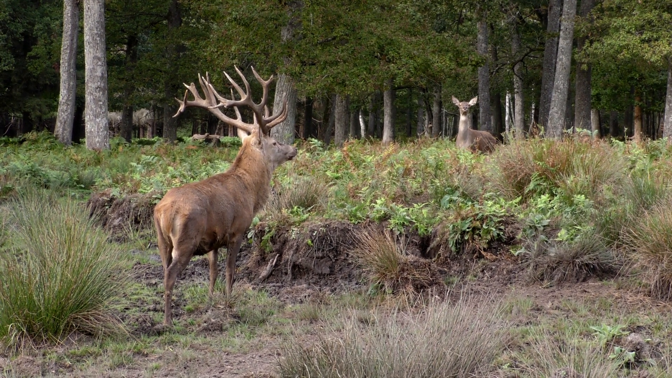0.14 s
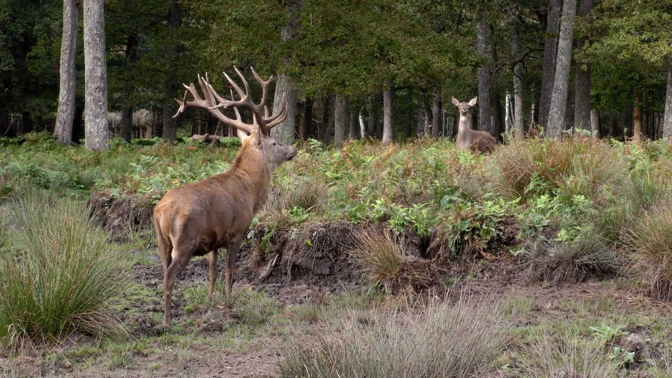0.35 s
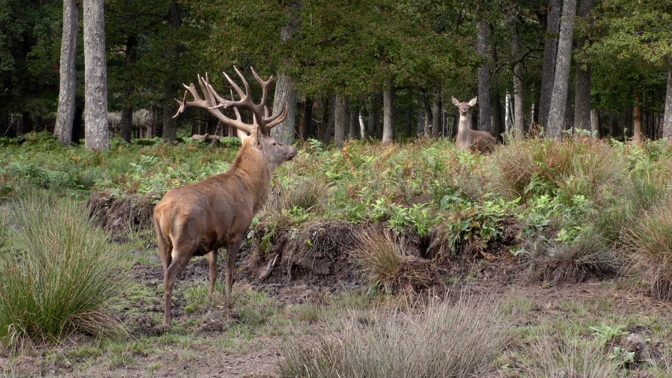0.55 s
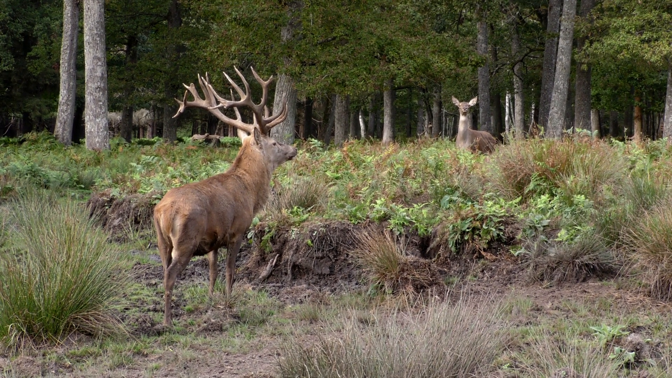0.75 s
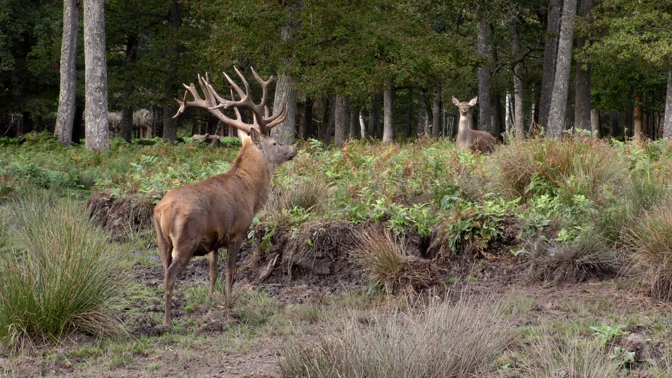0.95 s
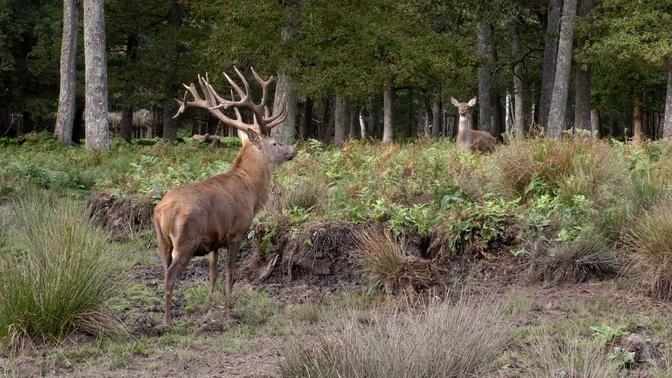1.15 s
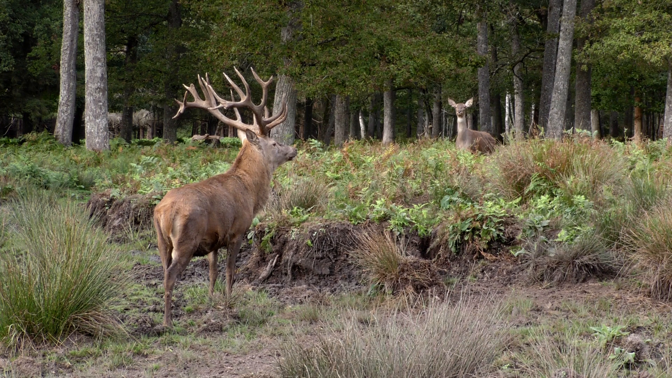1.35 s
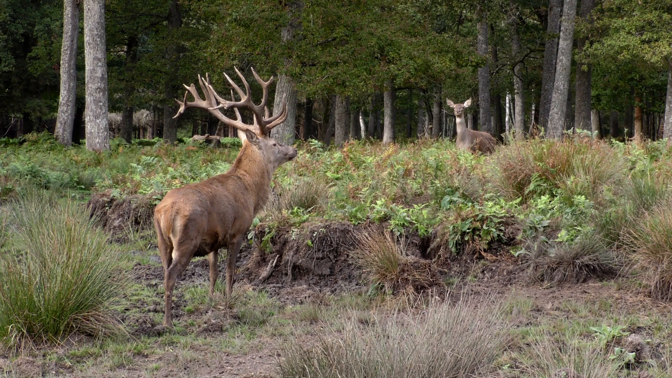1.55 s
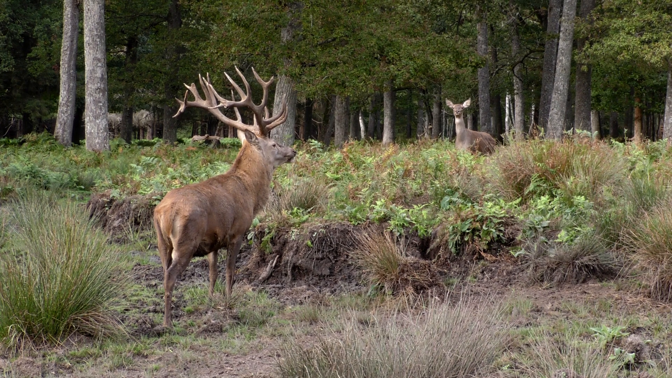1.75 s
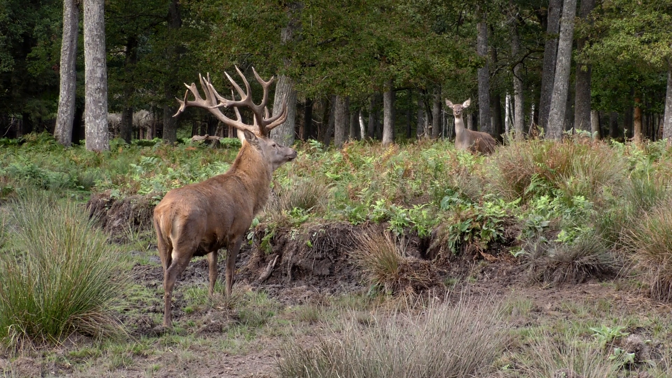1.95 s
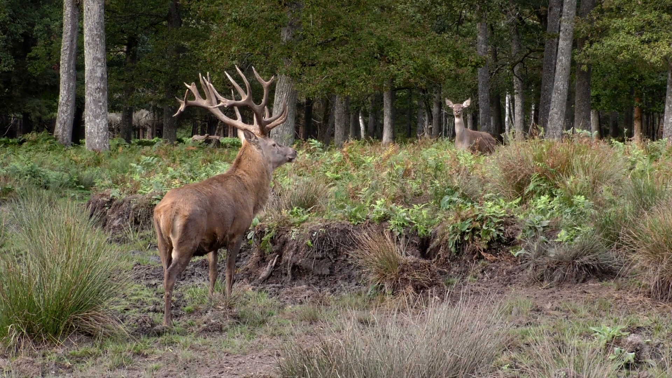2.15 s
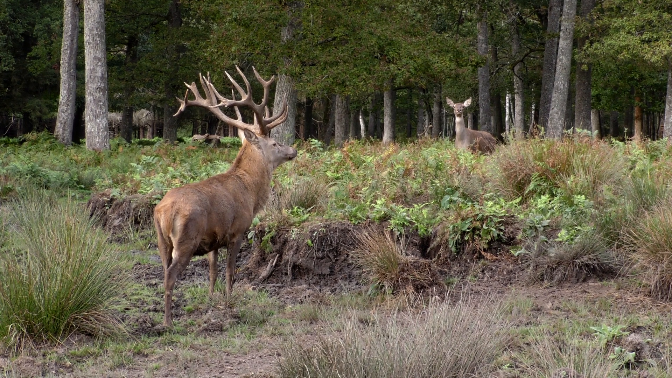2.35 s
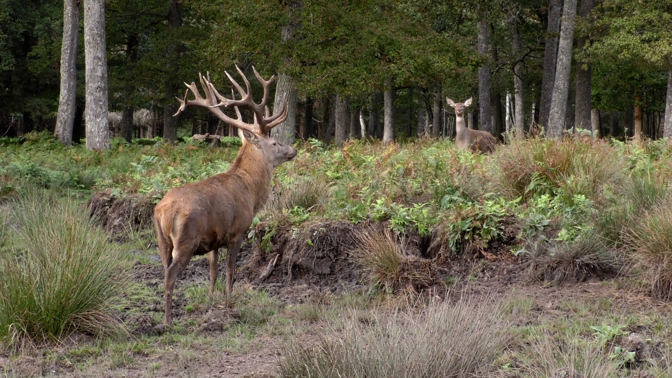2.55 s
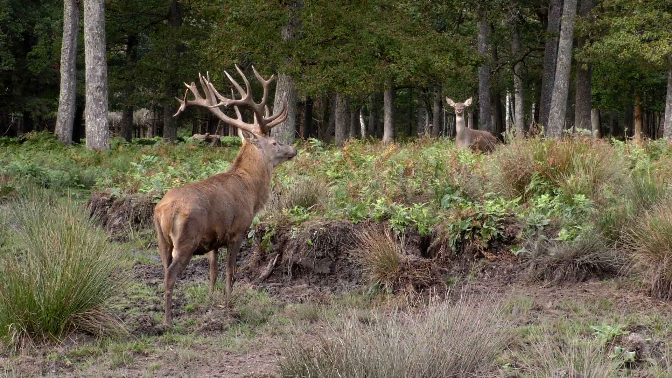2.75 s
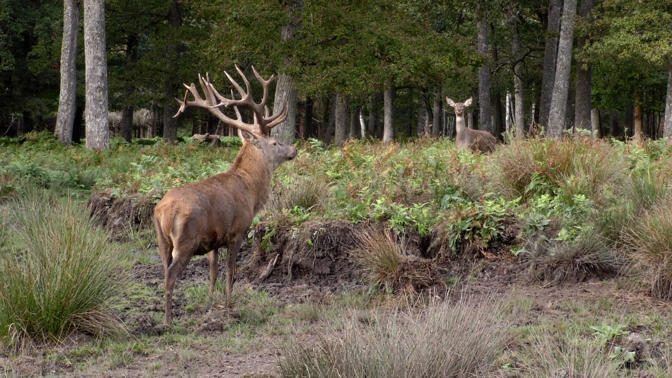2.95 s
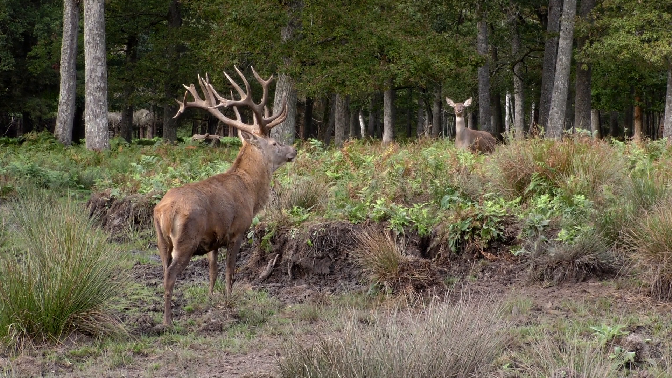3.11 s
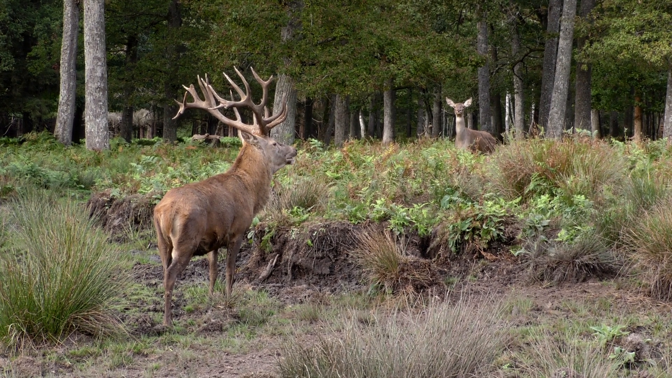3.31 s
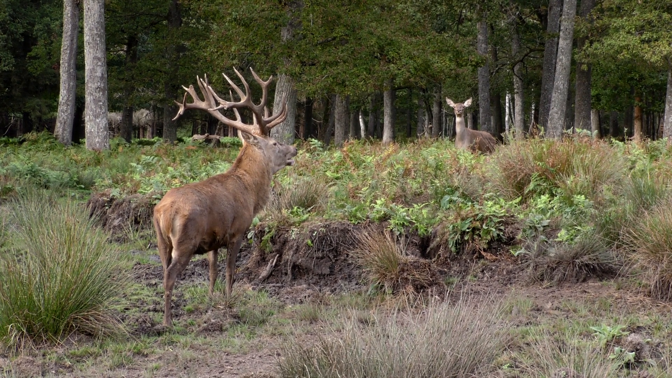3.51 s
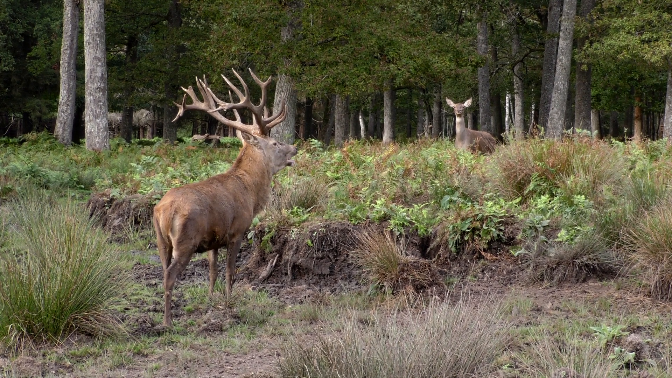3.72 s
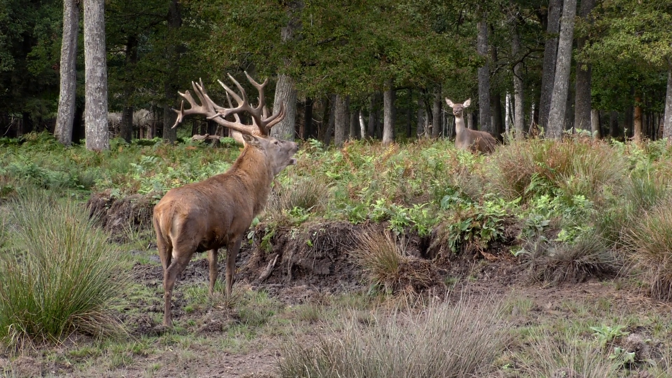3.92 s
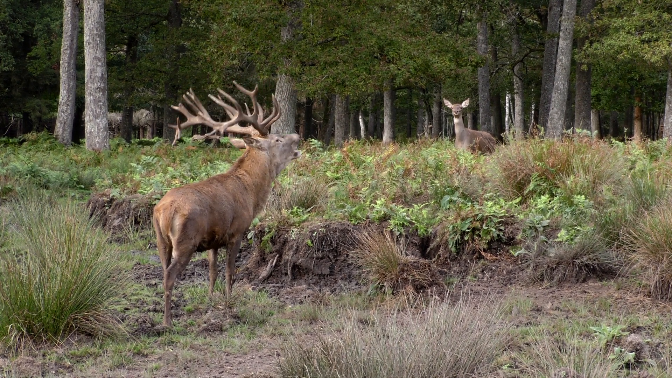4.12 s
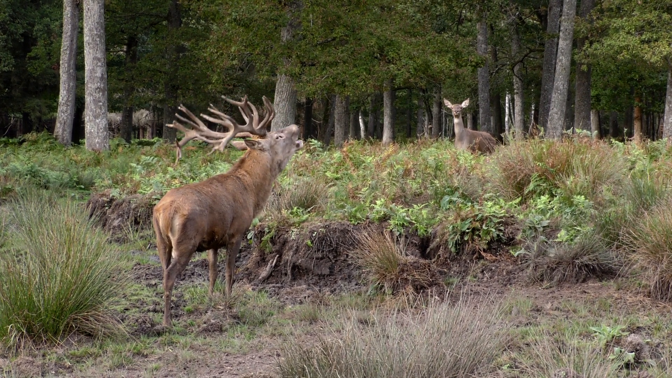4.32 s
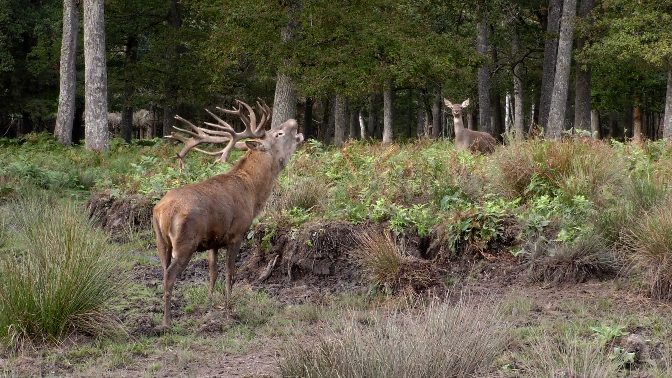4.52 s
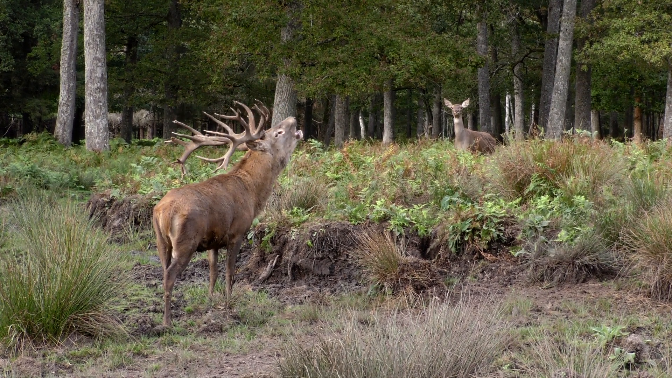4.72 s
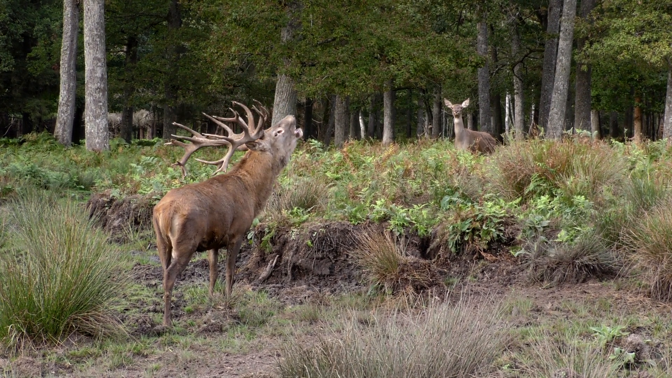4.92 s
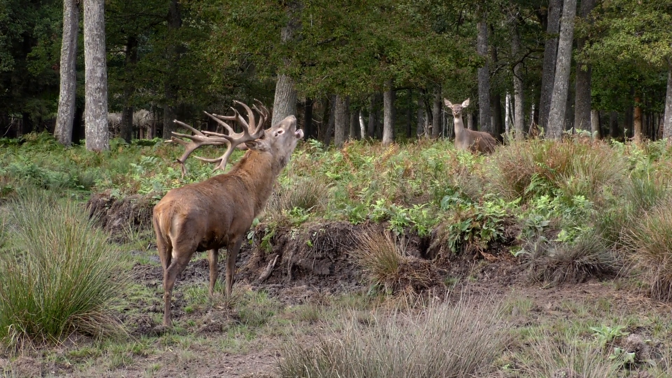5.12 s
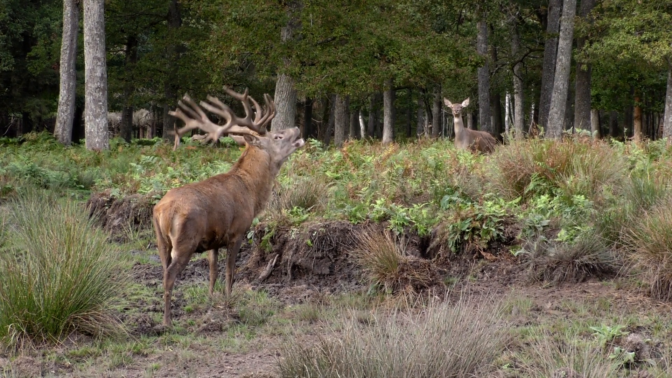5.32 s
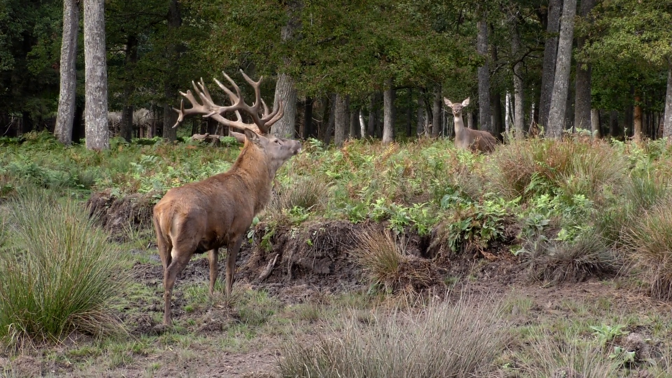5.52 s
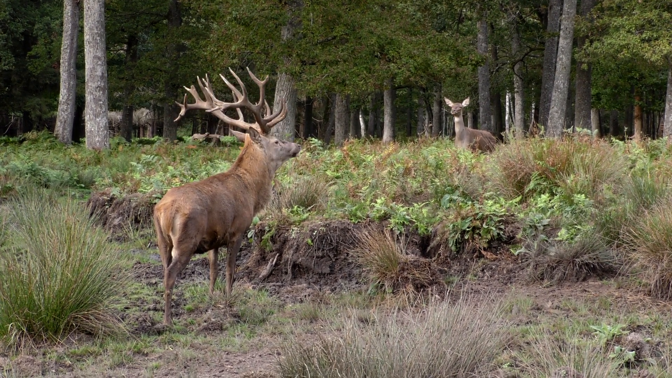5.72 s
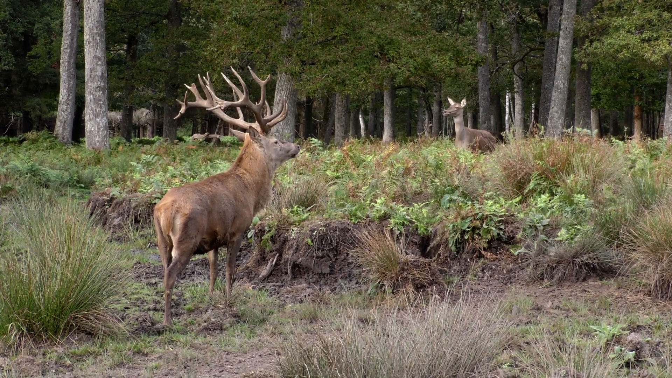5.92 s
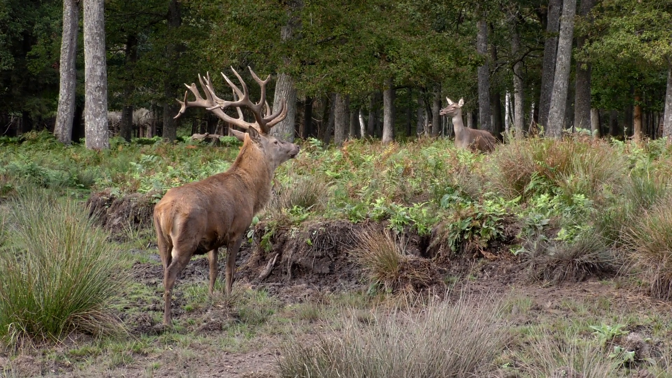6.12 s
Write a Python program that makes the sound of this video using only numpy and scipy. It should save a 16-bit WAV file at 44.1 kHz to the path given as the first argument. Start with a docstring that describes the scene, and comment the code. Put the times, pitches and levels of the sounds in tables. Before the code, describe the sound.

A red deer stag roars once, from low pulsing groan to coarse sustained bellow, echoing long through a quiet forest with distant bird calls.

```python
"""A woodland clearing: a red deer stag roars once, and the forest rings on. Uneven vocal-fold pulses and turbulent
puffs ring moving throat resonances: a low pulsing groan climbs in pitch while the stretching neck pulls the
resonances down, then a long harsh hold and a rattling collapse, followed by a soft hiss. Around it: a far crow-like
bird of gliding harmonics, a small bird's swept chips, an insect's rows of clicks, narrow noise ticks, wavering
hum tones, and still air of shaped noise."""
import sys
import numpy as np
from scipy import signal
from scipy.fft import rfft, irfft
from scipy.io import wavfile
from scipy.ndimage import uniform_filter1d, map_coordinates

SR = 44100
rng = np.random.default_rng(int(sys.argv[2]) if len(sys.argv) > 2 else 0)


def waveform_to_disk(signal):
    """Save audio, clipped to [-1, 1], as 16-bit WAV at the path in sys.argv[1]."""
    frames = np.transpose(np.atleast_2d(signal))
    scaled = np.clip(frames, -1, 1) * 32767
    samples = np.round(scaled).astype(np.int16)
    wavfile.write(sys.argv[1], SR, samples)


N = 276116
TIME = np.arange(N) / SR
SIDES = np.array([[1], [-1]])  # left, right

# The effort of the roar. Each row: time in seconds, level in dB, edge in dB, rasp in dB.
# Edge and rasp are the two upper ranges of the voice, relative to the level.
EFFORT = [(3.58, -63, -16, -20), (3.636, -56, -21.5, -25), (3.648, -49.5, -24, -32),
          (3.685, -48, -19, -34.5), (3.73, -42, -15.5, -31), (3.78, -38.5, -12.5, -32.5),
          (3.9, -33.5, -18.5, -42), (3.98, -29.5, -25, -44), (4.015, -30.5, -14.5, -46),
          (4.06, -29, -23, -42), (4.115, -25.5, -20, -39.5), (4.165, -24, -24.5, -44.5),
          (4.205, -21.5, -21.5, -35.5), (4.228, -17.5, -34, -41), (4.29, -19, -23, -36.5),
          (4.322, -22.5, -30.5, -34), (4.364, -22, -18.5, -38.5), (4.642, -22.5, -24.5, -36),
          (4.785, -23, -25.5, -39.5), (4.83, -23.5, -20, -37), (5.026, -26, -21, -39),
          (5.064, -22.5, -26, -40.5), (5.138, -23, -19, -44.5), (5.178, -23.5, -30, -46),
          (5.205, -22, -25, -41), (5.216, -25, -25.5, -45), (5.238, -29, -28, -38.5),
          (5.253, -25.5, -23.5, -38), (5.28, -31.5, -24.5, -43), (5.316, -34.5, -24, -43),
          (5.335, -47, -27, -33)]
# the voice collapses: the mouth falls partly open again and the slack folds thud
COLLAPSE_S, COLLAPSE_RAMP_S = 5.203, 0.008


def undb(db):
    """Decibels to gain."""
    return 10 ** (np.asarray(db) / 20)


def unit(x):
    """Scale to rms 1."""
    return x / np.sqrt(np.mean(x ** 2) + 1e-30)


def curves(table, at=TIME):
    """The columns of a table, joined by straight lines in time."""
    s, *columns = np.transpose(table)
    return np.array([np.interp(at, s, column) for column in columns])


def across(points, hz):
    """A (Hz, value) table read on a log-frequency axis."""
    f, value = np.transpose(points)
    return np.interp(np.log(hz + 1e-6), np.log(f), value)


def ramp(when, start, length):
    """A straight rise from 0 to 1."""
    return np.clip((when - start) / length, 0, 1)


def causal(gain):
    """The minimum-phase response with this magnitude: it rings after a pulse, never before."""
    cepstrum = irfft(np.log(gain + 1e-9))
    half = cepstrum.shape[-1] // 2
    cepstrum[..., 1:half] *= 2
    cepstrum[..., half + 1:] = 0
    return np.exp(rfft(cepstrum))


def colour(x, points, size=2048):
    """Filter by a (Hz, dB) spectrum."""
    gain = undb(across(points, np.fft.rfftfreq(size, 1 / SR)))
    return signal.fftconvolve(x, irfft(causal(gain)))[:len(x)]


def walk(rate):
    """Random levels held 1 / rate s and slewed twice; rms 1."""
    hold = max(int(SR / rate), 1)
    steps = np.repeat(rng.standard_normal(N // hold + 1), hold)
    slewed = uniform_filter1d(uniform_filter1d(steps, hold), hold)
    return unit(slewed[:N])


def steady(x, size=1100):
    """Hold the running rms at 1."""
    power = uniform_filter1d(uniform_filter1d(x ** 2, size), size)
    return x / np.sqrt(np.abs(power) + 1e-6 * np.mean(x ** 2))


def air(level_db=-60, rumble_pan_db=2):
    """A soft woodland hush over a low rumble that leans to the left, both from coloured noise."""
    # The colour of still air. Each row: frequency in Hz, relative level in dB per Hz.
    air_colour = [(20, 21), (35, 4), (55, 6.5), (80, 3), (110, -2), (170, -4), (240, -4), (295, -12),
                  (370, -2.5), (600, -0.5), (1000, -3.5), (1400, -5.5), (1750, -6), (2500, -8), (5000, -12),
                  (15000, -19)]
    # How alike the two ears hear it. Each row: frequency in Hz, correlation from -1 to 1.
    ear_likeness = [(40, 0.00026), (130, 0.56), (290, 0.78), (640, 0.75), (1410, 0.25), (3100, -0.13),
                    (6800, -0.38), (15000, -0.16)]
    hz = np.fft.rfftfreq(N, 1 / SR)
    alike = np.clip(across(ear_likeness, hz), -1, 1)
    mid, side = rfft(rng.standard_normal((2, N)))
    lean = SIDES * across([(40, rumble_pan_db), (150, 0.0077)], hz)
    both_ears = mid * np.sqrt(1 + alike) + SIDES * side * np.sqrt(1 - alike)
    hush = irfft(both_ears * undb(across(air_colour, hz) + lean), N)
    return unit(hush) * undb(level_db)


def hum(waver=0.0024, flutter_db=2, trim_db=-2):
    """Faint tones from far away: sines that waver slowly in pitch and level."""
    # The hum's tones. Each row: frequency in Hz, rms level in dB ahead of the trim.
    hum_tones = [(382.2, -75.5), (613.7, -82.5)]
    out = np.zeros(N)
    for hz, db in hum_tones:
        gain = undb(db + trim_db + flutter_db * walk(4.0))
        phase = 2 * np.pi * np.cumsum(hz * (1 + waver * walk(6.3))) / SR
        out += gain * np.sqrt(2) * np.sin(phase)
    return out


def ticks(ring_hz=3300, attack_s=0.0027, t60=0.11):
    """Faint dry ticks among the trees, each a brief burst of narrow noise."""
    # The ticks. Each row: time in seconds, level in dB.
    tick_hits = [(.69, -72), (.97, -68), (1.31, -70), (1.63, -71), (1.895, -68), (2.06, -73), (2.24, -70),
                 (2.99, -72), (3.3, -71)]
    strikes = np.zeros(N)
    for s, db in tick_hits:
        decay = undb(-60 * np.maximum(TIME - s, 0) / t60)
        strikes += undb(db) * ramp(TIME, s, attack_s) * decay
    band = [(.7 * ring_hz, -30), (.92 * ring_hz, 0), (1.08 * ring_hz, 0), (1.3 * ring_hz, -30)]
    return strikes * unit(colour(rng.standard_normal(N), band))


def insect(tooth_hz=330, tooth_share=0.45):
    """Short strokes of a toothed file: rows of tiny high clicks."""
    # The strokes. Each row: start in seconds, length in seconds, level in dB ahead of the colouring.
    rattle_strokes = [(5.673, 0.014, -56), (5.694, 0.016, -59), (5.728, 0.015, -62)]
    strokes = np.zeros(N)
    for start, length, db in rattle_strokes:
        strokes += undb(db) * ((TIME >= start) & (TIME < start + length))
    teeth = unit(np.exp(-(TIME * tooth_hz % 1) / tooth_share) * rng.standard_normal(N))
    return colour(strokes * teeth, [(5500, -31), (7200, -2.0), (10000, -1.0), (11800, -28)])


def hiss(start_s=5.53, attack_s=0.065, level_db=-68.5, fade_db_per_s=20):
    """A faint rush of coloured noise after the roar, which swells once and fades."""
    spectrum = [(1500, -14), (2600, -1.0), (3800, -3.0), (5100, -5.5), (5700, -17.0), (9000, -30)]
    rush = colour(rng.standard_normal(N), spectrum)
    age = np.maximum(TIME - start_s, 0)
    return unit(rush) * np.minimum(age / attack_s, 1) * undb(level_db - fade_db_per_s * age)


def diffuse(size):
    """Noise arriving from all around: two close-set microphones tell reflections apart only in the treble."""
    # Width of the reflections. Each row: frequency in Hz, side minus mid in dB.
    reflection_width = [(150, -22), (400, -27.5), (1000, -19), (2000, -5), (4000, -7)]
    mid, side = rng.standard_normal((2, size))
    return mid + colour(side, reflection_width) * SIDES


def scatter(x, t60):
    """Dense reflections from ground, leaves and nearby trunks; two channels."""
    response = diffuse(SR) * undb(-60 * TIME[:SR] / t60)
    return signal.fftconvolve(x[None], unit(response) / np.sqrt(SR), axes=1)[:, :N]


def forest(x, build_s=0.0036, size=131072):
    """Countless trunks send the sound back for seconds; the middle range lasts longest."""
    # The forest's answer by band. Each row: centre in Hz, level in dB, time to fall 60 dB in seconds.
    echo_bands = [(110, -6, 1.7), (198, 9, 2.2), (306, 2, 0.66), (345, 6.5, 2.34), (400, 9.5, 2.8),
                  (504, 1.5, 2.88), (690, 1, 3.4), (820, -2, 3.5), (1143, -0.5, 4.35), (1240, 2.5, 4.8),
                  (1420, -5, 4.16), (1640, 5.5, 4.23), (1940, 3, 3), (2290, 3.5, 4.4), (2960, 5, 2.3),
                  (4700, 13.5, 2.1), (9000, 0.5, .6)]
    t, hz = TIME[:size], np.fft.rfftfreq(size, 1 / SR)
    spectrum = rfft(diffuse(size))
    centres = np.array(echo_bands)[:, 0]
    response = 0
    # each row of the identity matrix opens one band and crossfades into its neighbours
    for (_, db, t60), own in zip(echo_bands, np.eye(len(echo_bands))):
        band = irfft(spectrum * across(np.c_[centres, own], hz))
        response = response + band * undb(db - 60 * t / t60)
    response = response * (1 - np.exp(-t / build_s)) / np.sqrt(SR)
    # moving air keeps changing the long paths, which blurs the pitch of the echoes
    drift_s = .0011 * walk(25)
    blurred = map_coordinates(x, [(TIME + drift_s) * SR], order=3)
    return signal.fftconvolve(blurred[None], response, axes=1)[:, :N]


def far_bird(spread=0.75, flutter_db=2.5, fall=.125, hoarseness=.03):
    """Nasal calls that sag in pitch and turn hoarse; the lowest harmonics lead and the higher ones swell after."""
    # The calls. Each row: start in seconds, length in seconds, starting pitch in Hz, rms level in dB.
    caw_calls = [(0.01, 0.24, 370, -69), (0.8, 0.29, 371.6, -68.5), (1.612, 0.3, 374, -69.5),
                 (2.492, .32, 368.7, -70), (3.415, 0.33, 371, -78)]
    # The harmonics. Each row: multiple of the pitch, level in dB, moment of the peak as a share of the call.
    caw_partials = [(2, 0, 0.05), (3, 3, 0.02), (4, -11, 0.3), (5, 3, 0.68), (6, -0.5, 0.63), (7, -3, 0.17)]
    out, wobble = np.zeros(N), hoarseness * walk(110)
    flutter = undb(flutter_db * walk(160))
    for start, length, hz, db in caw_calls:
        now = (TIME >= start) & (TIME < start + length)
        u = (TIME[now] - start) / length
        phase = 2 * np.pi * np.cumsum(hz * (1 + (wobble[now] - fall) * u ** 1.2)) / SR
        call = 0
        for multiple, partial_db, peak in caw_partials:
            swell = np.exp(-((u - peak) / spread) ** 2)
            call = call + undb(partial_db) * swell * np.sin(multiple * phase)
        envelope = np.abs(np.sin(np.pi * u)) ** 0.086  # nearly square
        out[now] += undb(db) * unit(call * flutter[now] * envelope)
    return out


def small_bird():
    """Each note is one rising whistle; the sharp chips are flicked upward within a few milliseconds."""
    # The notes. Each row: start in seconds, sweep length in seconds, from Hz, to Hz, peak level in dB.
    chip_sweeps = [(0.581, 0.004, 5940, 8050, -57), (0.584, 0.0064, 6800, 8200, -57),
                   (1.701, 0.0049, 4800, 8250, -52), (2.886, 0.004, 4730, 8400, -50),
                   (5.569, .12, 4890, 5160, -70)]
    out = np.zeros(N)
    for start, length, low_hz, high_hz, db in chip_sweeps:
        now = (TIME >= start) & (TIME < start + length)
        u = (TIME[now] - start) / length
        phase = 2 * np.pi * np.cumsum(low_hz + (high_hz - low_hz) * u) / SR
        out[now] += undb(db) * np.sin(phase) * np.sqrt(np.abs(np.sin(np.pi * u)))
    return out


def stretched(rest, full, when=TIME, lag=1):
    """A quantity that moves from its resting value to its full one as the neck stretches."""
    # The neck stretches and the larynx sinks, then eases a little. Each row: time in seconds, stretch from 0 to 1.
    neck_stretch = [(3.7, 0.01), (3.88, 0.05), (4.05, 0.52), (4.2, 0.78), (4.3, 0.92), (4.42, .98),
                    (4.6, 1), (4.9, 0.99), (5.08, 0.99)]
    return rest + (full - rest) * np.clip(curves(neck_stretch, when)[0], 0, 1) ** lag


def roughness(attack_s=0.026, release_s=0.036):
    """The folds tip quickly into each harsh bout and settle again after it."""
    # Bouts of uneven beating. Each row: start in seconds, length in seconds, roughness from 0 to 1.
    rough_bouts = [(3.552, 0.12, 0.6), (4.047, 0.055, 0.11), (4.113, 0.024, 0.8), (4.152, .035, 0.2),
                   (4.284, 0.024, 0.4), (4.389, 0.233, 0.22), (4.642, 0.15, 0.07), (4.785, 0.12, 0.12),
                   (4.926, 0.062, 0.24), (5.189, 0.16, 0.97)]
    # between the bouts the folds stay a little uneven: at rest, and stretched
    rough = stretched(0.019, 0.041)
    for start, length, peak in rough_bouts:
        rise = (TIME - start) / attack_s
        fall = 1 - (TIME - start - length) / release_s
        rough = np.maximum(rough, peak * np.clip(np.minimum(rise, fall), 0, 1))
    return np.clip(rough, 0, 1)


def folds(rough, order=8):
    """One sharp pulse each time the folds close, uneven in time and size when rough; also the cycle's phase."""
    # The pitch of the vocal folds. Each row: time in seconds, pitch in Hz.
    fold_pitch = [(3.62, 95.26), (3.658, 98.6), (3.69, 108), (3.71, 110.3), (3.798, 124), (3.9, 130.6),
                  (3.955, 134.6), (4.09, 138.8), (4.146, 150.8), (4.208, 161.6), (4.264, 164.9),
                  (4.35, 177.1), (4.522, 176), (4.778, 174.6), (4.906, 173.6), (4.994, 168.1),
                  (5.152, 160.7), (5.178, 157.3), (5.21, 152.8), (5.26, 122), (5.33, 91.83)]
    # a slower second vibration growls in the rough folds: rate as a share of the pitch, wander in turns per cycle
    growl_ratio, growl_wander = .365, 0.03996
    # its sway of force (log gain) and timing (cycles) at full roughness; and the random scatter of force
    growl_force, growl_timing, force_scatter = 0.49, 0.092, 0.26
    hz, = curves(fold_pitch)
    turns = np.cumsum(hz) / SR
    at = np.interp(np.arange(2, int(turns[-1]) - 1), turns, np.arange(N))  # closing moments in samples
    unrest, period = rough[at.astype(int)], SR / hz[at.astype(int)]
    timing_chance, force_chance, growl_chance = rng.standard_normal((len(at), 3)).T
    growl = 2 * np.pi * np.cumsum(growl_ratio + growl_wander * growl_chance)
    at = at + growl_timing * unrest * np.sin(growl) * period
    # the timing holds until the folds tip into chaos
    jitter = .0015 + .014 * unrest + .16 * unrest ** 4
    at = at + jitter * timing_chance * period
    size = np.exp(unrest * (force_scatter * force_chance + growl_force * np.cos(growl)))
    # windowed sincs place the pulses between samples
    taps = at.astype(int)[:, None] + np.arange(-order, order + 1)
    offset = taps - at[:, None]
    shape = np.sinc(offset) * np.cos(np.pi * offset / (2 * order + 2)) ** 2
    pulses = np.bincount(np.clip(taps, 0, N - 1).ravel(), (shape * size[:, None]).ravel(), N)
    return unit(pulses), turns % 1


def dispersed(x, lag_s=.0022, knee_hz=1100):
    """Each pulse opens with its bass and ends with its treble, so it is a short smear, not a spike."""
    hz = np.fft.rfftfreq(N, 1 / SR)
    lag = lag_s * (1 - np.exp(-hz / knee_hz))
    return irfft(rfft(x) * np.exp(-2j * np.pi * np.cumsum(lag) * SR / N), N)


def smeared(x, share, t60=.04, size=4096):
    """As the head tips up and away, this share arrives by many short paths, blurring pulses but keeping colour."""
    noise = rng.standard_normal(size) * undb(-60 * TIME[:size] / t60)
    paths = rfft(np.roll(noise, size // 2))
    blur = signal.fftconvolve(x, irfft(paths / np.abs(paths)), mode="same")
    share = np.clip(share, 0, 1)
    return np.sqrt(1 - share) * x + np.sqrt(share) * blur


def gliding(x, shape, size=256):
    """Filter the roar piece by piece with a gain shape(times, Hz) that moves."""
    length = size * 16
    first, last = int(EFFORT[0][0] * SR) - 2 * size, int(EFFORT[-1][0] * SR) + 8 * size
    starts = np.arange(first, last, size)
    gain = shape((starts + size) / SR, np.fft.rfftfreq(length, 1 / SR))
    pieces = x[starts[:, None] + np.arange(2 * size)] * signal.get_window("hann", 2 * size)
    out = np.zeros(N)
    for start, ring in zip(starts, irfft(rfft(pieces, length) * causal(gain))):
        out[start:start + length] += ring
    return out


def resonances(table, when, hz):
    """A group of resonances: they sink as the neck stretches, and the mouth shifts their balance."""
    # the mouth gapes briefly at the loudest moment and lifts the resonances by this share for each unit of lag
    gape_s, gape_length_s, gape_ramp_s, gape_lift = 4.203, 0.118, 0.011, 0.04
    # the throat goes on shifting early in the hold, then settles
    settle_s, settle_length_s = 4.44, 0.26
    # the mouth narrows toward the end of the roar; the collapse undoes a share of that
    closing_s, closing_length_s, reopen_share = 4.87, 0.09, 0.5
    when = when[:, None]
    slack = stretched(1.39, 0.8, when)  # width factor: the resonances narrow as the neck stretches
    hold = ramp(when, gape_s + gape_length_s - gape_ramp_s, gape_ramp_s)
    gape = ramp(when, gape_s, gape_ramp_s) - hold
    reopened = reopen_share * ramp(when, COLLAPSE_S, COLLAPSE_RAMP_S)
    narrow = ramp(when, closing_s, closing_length_s) * (1 - reopened)
    early = hold * (1 - ramp(when, settle_s, settle_length_s))
    gain = 0
    for (rest_hz, full_hz, lag, width, rest_db, full_db,
         gape_db, hold_db, closing_db, early_hz, early_db) in table:
        sunk_hz = np.exp(stretched(np.log(rest_hz), np.log(full_hz), when, lag))
        centre = sunk_hz * (1 + gape_lift * lag * gape) + early_hz * early
        db = stretched(rest_db, full_db, when, lag) + gape_db * gape + hold_db * hold
        db = db + closing_db * narrow + early_db * early
        gain = gain + undb(db) / (1 + (2 * (hz - centre) / (width * slack)) ** 2)
    return gain


def throat(when, hz):
    """The main resonances over a fixed chest tone, radiated by the mouth; the bass lifts as the folds go slack."""
    # Throat and mouth resonances; those with a larger lag sink later in the stretch. Each row: Hz at rest,
    # Hz stretched, lag exponent, width in Hz ahead of the slack factor, dB at rest, dB stretched,
    # dB gained in the gape, dB gained from the hold on, dB gained as the mouth narrows,
    # Hz gained early in the hold, dB gained early in the hold.
    throat_rings = [(283, 213, 0.52, 57, 5.5, -13.5, -8.5, 7.5, -5.5, 2.5, 3.5),
                    (620, 322.6, 0.79, 81, -7.5, -12.5, 3, 6.5, -0.5, 8, 1.5),
                    (1064, 464, 0.8, 75.5, -3, -1, 0, -9, 8, 6.5, -4.5),
                    (1492, 780, 1.33, 140, -1.5, -4.5, 2.5, -1.5, -6.5, 15.5, -1.5),
                    (1683, 1115, 2.15, 130, 4.5, -12, 2, -2, 6.5, 55.5, 0),
                    (2070, 1408, 2.4, 66, -5, -6, 4, 6.5, -5, -4.5, -0.5),
                    (2782, 1893, 1.25, 176, -16.5, -9.5, 3.5, 0, 1, -100, 5.5),
                    (3590, 2110, 1.2, 45, -30, -18, 10.5, 3, 0, 7.5, 3.5)]
    # How well the mouth radiates. Each row: frequency in Hz, gain in dB.
    mouth_gain = [(60, -16), (120, 1), (170, -3), (260, -3), (400, 8), (700, 5.5), (960, 9), (1200, 2),
                  (1700, -6.5), (2800, 7), (4500, -45.5)]
    chest_hz, chest_width_hz, chest_db = 197.7, 31, -4.5
    collapse_bass_db, collapse_bass_hz = 2.5, 190
    chest = undb(chest_db) / (1 + (2 * (hz - chest_hz) / chest_width_hz) ** 2)
    collapse = ramp(when[:, None], COLLAPSE_S, COLLAPSE_RAMP_S)
    bass_db = collapse_bass_db * collapse / (1 + (hz / collapse_bass_hz) ** 2)
    return (chest + resonances(throat_rings, when, hz)) * undb(across(mouth_gain, hz) + bass_db)


def upper(table, wander_share=.008, flutter_db=3.0, settled_share=0.25):
    """High resonances that each wander and flutter with tongue and lips, and settle once the neck is stretched."""
    def shape(when, hz):
        def unrest():
            amount = stretched(0.98, settled_share, when, lag=6.9)
            return (np.interp(when, TIME, walk(32)) * amount)[:, None]

        gain = 0
        for row in table:
            wandering = resonances([row], when, hz * (1 + wander_share * unrest()))
            gain = gain + wandering * undb(flutter_db * unrest())
        return gain
    return shape


def stag(turbulence=3.14, open_share=1.0, turbulent_limit=0.28):
    """Pulses and a puff of turbulent air in every cycle ring the throat."""
    # Upper resonances of the throat. Each row: Hz at rest, Hz stretched, lag exponent, width in Hz ahead of the
    # slack factor, dB at rest, dB stretched, dB gained in the gape, from the hold on, and as the mouth narrows,
    # then Hz and dB gained early in the hold.
    edge_rings = [(2720, 2430, 0.72, 260, -2, -14.5, 8, 3, -3, -30.5, 10),
                  (3310, 2780, 1.1, 140, 2.5, 1.5, -12.5, -6.5, 0, 148.5, -2),
                  (3780, 3080, .8, 96, -6.5, 3.5, -7.5, -1, 0, 132.5, -3),
                  (4150, 3330, 1.1, 210, -11, -11, 2, 3, -9, 58, -3.5),
                  (4500, 3780, 0.84, 280, -14, -14, 2.5, 5, -2.5, -50.5, -3.5),
                  (5400, 4220, 1.3, 380, -22, -19, 1.5, 7, -2.5, 0, 2)]
    # The highest resonances. Each row: the same columns and units as the upper resonances.
    rasp_rings = [(5600, 4600, 1.5, 540, 1.5, -5, -4.5, 6, 0.98, 203, -4),
                  (6500, 4950, 1.4, 460, -4.5, -6.5, 11, -4, 0, 150, 4),
                  (7100, 5940, 0.81, 750, -6, -1.5, -8, 2.5, -2, 153, -0.5),
                  (7900, 6850, 0.96, 710, -18, -8, -5.5, 3, -1, -200, 4),
                  (9000, 7900, 1, 1000, -26, -15, 0, 3.5, 0, -0.5, 3),
                  (10500, 9400, 0.9, 900, -31, -23, -9.5, 7.5, 1, 0, -4)]
    rough = roughness()
    level_db, edge_db, rasp_db = curves(EFFORT)
    pulses, phase = folds(rough)
    # turbulence stops growing beyond the limit of roughness
    puffs = np.minimum(rough, turbulent_limit) * unit(np.exp(-phase / open_share) * rng.standard_normal(N))
    puff_colour = [(100, -14), (350, -9), (600, -6), (820, 3), (1300, -2), (2000, 1), (3000, 4), (6000, 4)]
    flow = dispersed(pulses + turbulence * colour(puffs, puff_colour))
    body = steady(gliding(flow, throat))
    # share of each upper range that arrives smeared: at rest, and stretched
    edge = steady(gliding(smeared(flow, stretched(.15, 0.48)), upper(edge_rings)))
    rasp = steady(gliding(smeared(flow, stretched(.25, .92)), upper(rasp_rings)))
    sounding = np.interp(TIME, [3.58, 3.645, 5.3, 5.345], [0, 1, 1, 0])
    return sounding * undb(level_db) * (body + undb(edge_db) * edge + undb(rasp_db) * rasp)


def scene():
    """The stag stands almost straight ahead; the birds are deep among the trees."""
    roar, caws, chips = stag(), far_bird(), small_bird()
    # the upper range of the roar favours the right side a little: (Hz, dB)
    lean = [(600, .05), (1300, 0.67), (4000, .5)]
    direct = np.array([colour(roar, [(hz, -way * db) for hz, db in lean]) for way in SIDES[:, 0]])
    deer = direct + undb(-20) * scatter(roar, t60=0.57) + undb(-12) * forest(roar)
    far = caws + undb(-3) * scatter(caws, t60=0.93) + undb(3) * forest(caws)
    small = undb(-2) * chips + undb(0.5) * scatter(chips, t60=0.16)
    return deer + far + small + hiss() + insect() + ticks() + hum() + air()


def record(dry, top_hz=15700):
    """The recorder cuts the top with a steep low-pass."""
    return signal.sosfilt(signal.ellip(10, .1, 80, top_hz, fs=SR, output="sos"), dry)


dry = scene()
out = record(dry)
waveform_to_disk(out)
```